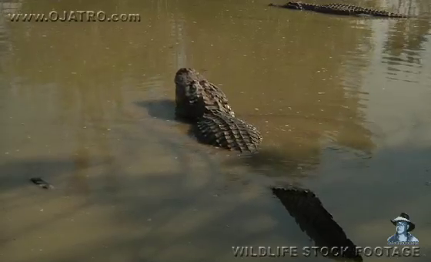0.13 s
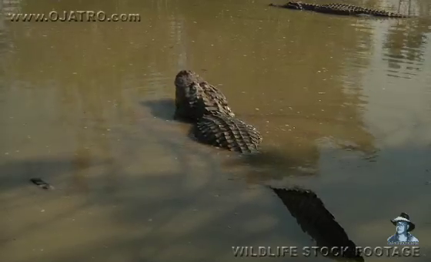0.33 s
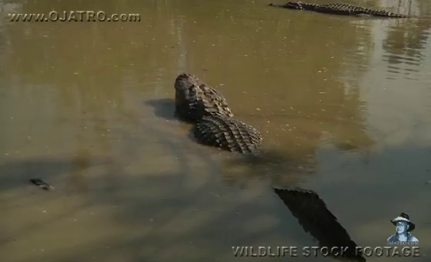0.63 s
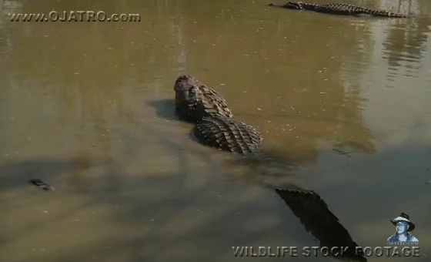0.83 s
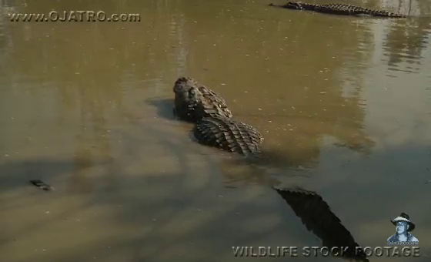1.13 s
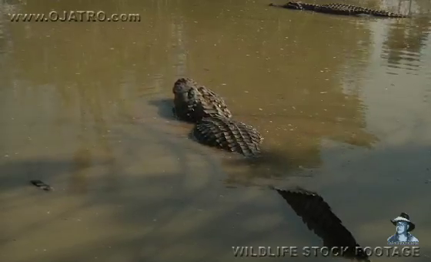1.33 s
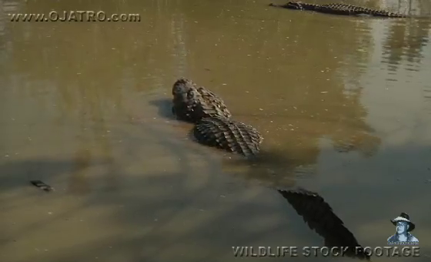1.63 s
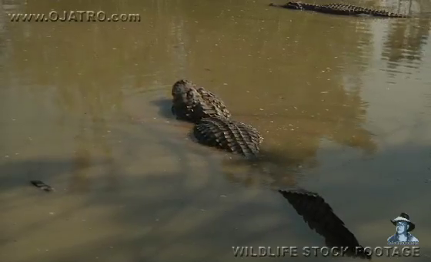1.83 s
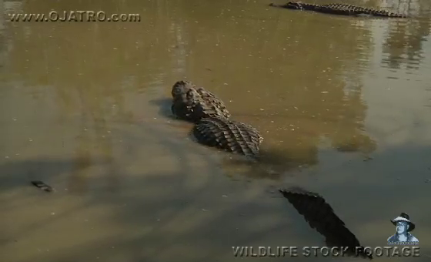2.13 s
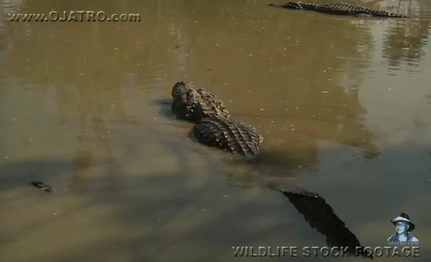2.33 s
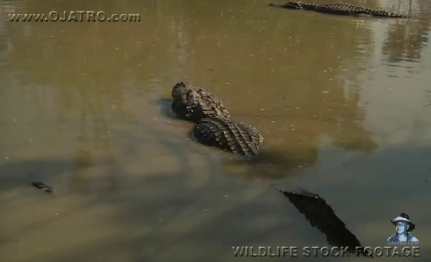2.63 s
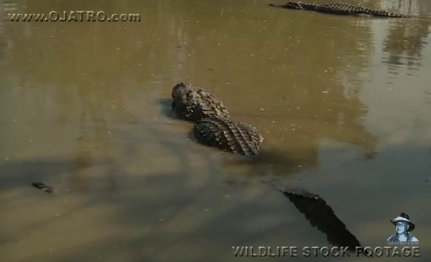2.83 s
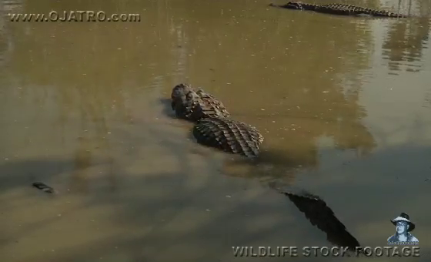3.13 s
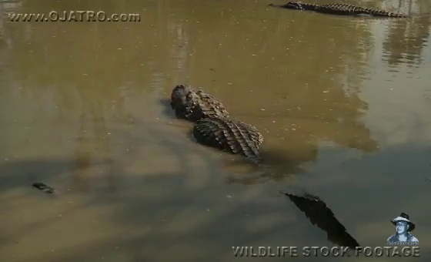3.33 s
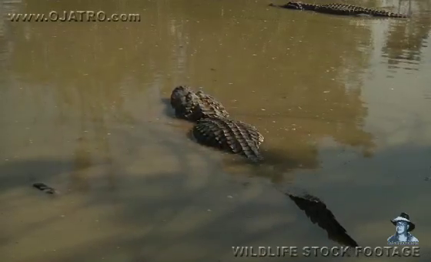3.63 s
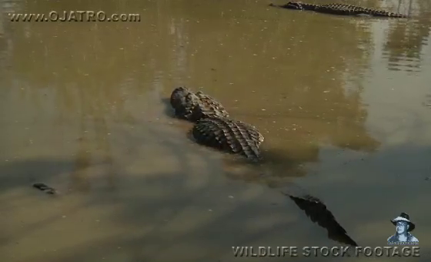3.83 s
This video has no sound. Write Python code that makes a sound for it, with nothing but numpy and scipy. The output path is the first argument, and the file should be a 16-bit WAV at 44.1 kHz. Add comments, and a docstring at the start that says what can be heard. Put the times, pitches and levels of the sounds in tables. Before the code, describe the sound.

An alligator bellows in a quiet outdoor pond: after two seconds of faint rumble and distant bird whistles, a deep sinking tone starts, breaks into knocking rattle, then swells to a rasping roar, heard fairly close.

```python
"""A swamp pond with a low steady rumble: birds whistle far off, then an alligator bellows.
Its slack folds start with a few knocks and settle into a deep sinking tone, air hissing from its nostrils.
The tone breaks into a rattle with moans, more knocks and a wheeze, then swells to a throbbing, rasping roar.
Water fizzes over its shaking back. Clicks and noise puffs timed by one fold rhythm ring body and throat
filters; moans, booms and whistles are sines."""
import sys
import numpy as np
from scipy import signal
from scipy.fft import rfft, irfft
from scipy.io import wavfile

SR = 44100
rng = np.random.default_rng(int(sys.argv[2]) if len(sys.argv) > 2 else 0)


def file_out(sig):
    """Save sig as 16-bit WAV at sys.argv[1]."""
    # one column per channel
    cols = np.atleast_2d(sig).T
    # limit, then scale
    lim = np.clip(cols, -1, 1)
    pcm = np.round(lim * 32767).astype(np.int16)
    wavfile.write(sys.argv[1], SR, pcm)


N = 176400
T = np.arange(N) / SR  # s

# outdoor rumble: (frequency [Hz], relative gain [dB])
RUMBLE_COLOUR = [(12, -52), (20, -14), (49, -1.5), (112, 0), (137, -0.5), (153, -11.5), (245, -8),
                 (266, -16.5), (324, -13.5), (404, -19), (597, -22), (1380, -42), (15500, -51)]
RUMBLE_DB = -46.5
# distant whistles: (time [s], length [s], start [Hz], end [Hz], peak level [dB])
BIRD_NOTES = [(0.885, 0.065, 3140, 2400, -78), (1.038, 0.06, 1850, 2230, -75),
              (1.356, 0.087, 3300, 1570, -75.5)]
# water thrown up by the back: (time [s], level [dB]); (frequency [Hz], relative gain [dB])
FIZZ_LEVEL = [(3.35, -72), (3.47, -58.5), (3.62, -54.5), (3.78, -54), (4.0, -53.5)]
FIZZ_COLOUR = [(700, -24), (1500, -12), (2600, 4.5), (3700, 0), (6300, 2), (7200, -5), (8100, 0.5),
               (8800, -9.5), (9700, -6.5), (11000, -19.5)]
# air out of the nostrils: (time [s], level [dB])
HISS_LEVEL = [(1.98, -94), (2.05, -63), (2.25, -59), (2.45, -61), (2.6, -64.5), (3.15, -63), (3.37, -69.5),
              (3.5, -70)]
# nostril resonances: (frequency [Hz], width [Hz] before scaling, relative gain [dB])
NOSTRIL_RESONANCES = [(2497, 100, 2.5), (2970, 260, 4), (4360, 1600, 0), (7030, 670, -0.5),
                      (9400, 2000, -14)]
NOSTRIL_WIDTH_SCALE = 1.78
# throat wheezes: (centre [s], half length to 1/e [s], frequency [Hz], width [Hz], peak level [dB])
WHEEZES = [(3.174, 0.086, 2700, 69.5, -63), (3.477, 0.048, 1850, 200, -53)]
# moans in the rattle: (time [s], length [s], start frequency [Hz], peak level [dB])
MOANS = [(2.709, 0.11, 599, -49), (2.94, 0.2, 420, -39.5), (3.123, 0.23, 427, -40)]
MOAN_SAG_HZ_PER_S, MOAN_WAVER_RATIO, MOAN_FLICKER_DB = 210, .012, 2
# air rasping through the throat: (time [s], level [dB] before trim and throb bursts)
RASP_LEVEL = [(1.98, -100), (2.05, -70), (2.7, -68.5), (2.95, -60.5), (3.37, -59), (3.46, -54),
              (3.505, -47.5), (3.78, -45.5), (3.84, -47.5), (4.0, -49)]
RASP_TRIM_DB = -1.5
# throat resonances: (frequency [Hz], width [Hz] before scaling, relative gain [dB])
THROAT_RESONANCES = [(993, 66, -3), (1076, 48, 4), (1376, 48, -4), (1620, 69, 0), (1836, 130, -5),
                     (2048, 31, 0.5), (2348, 69, -3.5), (2450, 72, -3.5), (2667, 42, -9), (3007, 26, -5),
                     (3600, 430, -18)]
THROAT_WIDTH_SCALE, THROAT_FLICKER_DB = 1.34, 2.5
SHUT_TILT_DB_PER_OCT, OPEN_S, OPEN_SPREAD_S = 0.5, 3.42, 0.068
AIR_LENGTH_TURNS, AIR_LEAK, TICK_AIR, TICK_SPREAD_DB = .25, .3, .55, 3.5
# throbs of the bellow: (time [s], boom peak [dB], rasp lift [0-1])
THROBS = [(3.583, -27.5, 0), (3.618, -27, 0.23), (3.73, -18, 0.04), (3.803, -27.5, .9), (3.866, -19, 0.98),
          (3.929, -19.5, 1)]
BOOM_HALF_S, BOOM_HZ = 0.0093, 146  # half lengths to 1/e
BURST_DB, BURST_LAG_S, BURST_HALF_S = 10.5, 0.0085, .011
# single slaps of the folds: (time [s], treble peak [dB] before trim, bass peak [dB])
KNOCKS = [(2.001, -73, -32), (2.022, -68, -27.5), (2.0425, -57, -27), (2.0663, -44, -33.5),
          (2.7866, -39, -48), (2.9234, -36, -33), (3.0222, -36, -37), (3.0635, -36, -27),
          (3.1679, -42, -35), (3.2075, -38, -25)]
TICK_TRIM_DB = -11
# slap ringing in the body, then in the throat: (frequency [Hz], relative gain [dB])
THUMP_COLOUR = [(30, -25.5), (180, 6.5), (300, -6.5), (600, -4.5), (780, -29), (4000, -64)]
TICK_COLOUR = [(500, -33), (1750, -17), (2300, 6.5), (2900, -12), (12000, -31)]
# irregular flapping: (time [s], level [dB] before the mid-rattle tilt); (frequency [Hz], relative gain [dB])
FLUTTER_LEVEL = [(1.98, -70), (2.04, -33.5), (2.5, -58.5), (2.86, -36.5), (2.95, -39), (3.2, -37.5),
                 (3.42, -35.5), (3.53, -33.5), (4.0, -33)]
FLUTTER_COLOUR = [(20, -38), (42, -25), (70, -6), (105, -4), (140, 10), (175, 6), (225, -1.5), (300, -11.5),
                  (400, 0), (460, -10), (510, -0.5), (550, -19), (590, -6.5), (660, -30.5), (780, -34),
                  (1200, -33.5), (1600, -53.5), (5000, -80)]
FLAP_WANDER_TURNS, FLAP_AIR = .07, .45
# the flapping is brightest in mid-rattle
RATTLE_S, RATTLE_HALF_S, RATTLE_TREBLE_DB, RATTLE_BASS_DB = 3.08, 0.18, 6, -3
# fold rate, four stages of the bellow: (time [s], pitch [Hz])
PITCH_START = [(2.0, 46.5), (2.05, 49.7), (2.09, 61)]
PITCH_TONE = [(2.15, 64.7), (2.516, 58.44), (2.748, 52.08), (2.876, 46.66)]
PITCH_RATTLE = [(3.0, 43.48), (3.2, 42.06), (3.36, 37.59), (3.43, 42.25)]
PITCH_ROAR = [(3.48, 59.73), (3.598, 61.61), (4.0, 63.56)]
# regular beating, smooth tone: (time [s], level [dB] before treble shading)
TONE_LEVEL = [(2.035, -55), (2.065, -32.5), (2.16, -27), (2.55, -29), (2.68, -33), (2.83, -35.5),
              (3.05, -42.5), (3.3, -38), (3.42, -30.5), (3.5, -64)]
# regular beating, hoarse roar: (time [s], level [dB])
ROAR_LEVEL = [(3.44, -70), (3.49, -28), (3.53, -30.5), (3.6, -29.5), (3.77, -30.5), (3.87, -29), (4.0, -29)]
# trunk shaking at the fold rate: (time [s], level [dB])
CHEST_LEVEL = [(2.5, -60), (2.7, -46), (3.5, -49), (3.6, -60)]
# body and throat colours of tone and roar: (frequency [Hz], relative gain [dB])
TONE_COLOUR = [(20, -41), (45, -6), (62, -3.5), (92, -6), (128, -0.5), (140, 7.5), (172, 3), (188, -19),
               (215, -2.5), (250, -2.5), (390, -9.5), (412, -10.5), (450, -1.5), (540, -14.5), (585, -2),
               (625, -7), (660, -21), (705, -20.5), (770, -39.5), (960, -37.5), (1270, -38), (1450, -65)]
ROAR_COLOUR = [(20, -38.5), (62, -10), (124, -1.5), (186, -5), (248, -5), (310, -14), (375, -7.5),
               (435, -21), (495, -12), (560, -27.5), (680, -38), (3000, -72)]
JITTER_TURNS, SHIMMER, ROAR_JITTER_TURNS, ROAR_SHIMMER = .003, .04, .025, .2
TREBLE_DB_PER_DB = 1.76  # extra gain of the upper partials as the tone swells
OPENING_HZ, OPENING_WIDTH_HZ = 120, 81  # the slow opening of the folds comes before their snap
BODY_HZ, BODY_WIDTH_HZ = 247, 130  # the body wall lags here and smears each pulse
SPLIT_HZ, STOP_HZ, EDGE_HZ = 326, 3000, 15800  # treble split, body wall limit, recorder limit


def amp(db):
    """Decibels to gain."""
    return 10 ** (np.asarray(db) / 20)


def unit(x):
    """Scales to rms 1."""
    return x / np.sqrt(np.mean(x ** 2) + 1e-20)


def curve(points):
    """Joins (time [s], value) points by straight lines."""
    return np.interp(T, *np.transpose(points))


def level(points):
    """Gain from a dB curve, silent before its first point."""
    return amp(curve(points)) * (T >= points[0][0])


def bump(centre_s, half_s):
    """Gaussian of height 1."""
    return np.exp(-((T - centre_s) / half_s) ** 2)


def arch(start_s, length_s):
    """Half-sine swell and fade."""
    return np.sin(np.pi * np.clip((T - start_s) / length_s, 0, 1))


def sweep(pitch_hz):
    """Sine whose phase sums the pitch."""
    return np.sin(2 * np.pi * np.cumsum(pitch_hz) / SR)


def drift(hz):
    """Slow random motion of rms 1."""
    f = np.fft.rfftfreq(N, 1 / SR)
    return unit(irfft(rfft(rng.standard_normal(N)) / (1 + (f / hz) ** 4), N))


def colour(x, points):
    """Minimum-phase filter with the given (frequency [Hz], gain [dB]) shape."""
    f, db = np.transpose(points)
    hz = abs(np.fft.fftfreq(16384, 1 / SR))
    log_gain = np.log(amp(np.interp(np.log(hz + 1), np.log(f), db)))
    spectrum = np.exp(np.conj(signal.hilbert(log_gain)))
    taps = np.fft.ifft(spectrum).real[:4096]
    return signal.fftconvolve(x, taps)[:N]


def strike(clicks, points):
    """Colours clicks so that each rings up to its own height."""
    single = colour(1. * (T == 0), points)
    return colour(clicks, points) / abs(single).max()


def ring(x, hz, width_hz):
    """A resonance with steep skirts: one complex pole, run twice."""
    pole = np.exp((2j * hz - width_hz) * np.pi / SR)
    for _ in range(2):
        x = signal.lfilter([1 - abs(pole)], [1, -pole], x + 1e-18)
    return 2 * x.real


def smear(x, hz, width_hz):
    """All-pass: delays what lies near one resonance, leaving all levels alone."""
    r = np.exp(-np.pi * width_hz / SR)
    a = [1, -2 * r * np.cos(2 * np.pi * hz / SR), r * r]
    return signal.lfilter(a[::-1], a, x)


def treble(x):
    """The part above the body's boom."""
    return signal.sosfiltfilt(signal.butter(2, SPLIT_HZ, "high", fs=SR, output="sos"), x)


def muffle(x):
    """The body wall passes little treble."""
    return signal.sosfilt(signal.butter(2, STOP_HZ, fs=SR, output="sos"), x)


def pulses(turns):
    """One click at each whole turn."""
    whole = np.floor(np.maximum.accumulate(turns))
    return np.diff(whole, prepend=np.floor(turns[0]))


def puffs(turns, length_turns, leak):
    """Noise let through once a cycle, over a steady leak."""
    gate = leak + np.exp(-(turns % 1) / length_turns)
    return unit(gate * rng.standard_normal(N))


def banks(x, t60_s, wet_db):
    """Faint scattered echoes from the banks and trees: decaying noise after a 20 ms gap."""
    t = np.arange(SR // 2) / SR
    tail = rng.standard_normal(len(t)) * amp(-60 * t / t60_s) * (t > .02)
    return x + amp(wet_db) * signal.fftconvolve(x, tail / np.linalg.norm(tail))[:N]


def background():
    """Steady low outdoor rumble and faint hiss: coloured noise."""
    return amp(RUMBLE_DB) * unit(colour(rng.standard_normal(N), RUMBLE_COLOUR))


def birds():
    """Faint gliding whistles far off in the trees, with strong echoes."""
    notes = np.zeros(N)
    for s, length_s, start_hz, end_hz, db in BIRD_NOTES:
        progress = np.clip((T - s) / length_s, 0, 1)
        pitch_hz = start_hz + (end_hz - start_hz) * progress
        notes += amp(db) * arch(s, length_s) * sweep(pitch_hz)
    return banks(notes, t60_s=.6, wet_db=-4)


def water(turns, drops_per_s=3000, size_db=4):
    """Tiny droplets dance off the back and patter on the pond: random clicks shaken at the fold rate, and noise."""
    sizes = amp(size_db * np.minimum(rng.exponential(1, N), 4)) * rng.standard_normal(N)
    drops = unit(sizes * (rng.random(N) < drops_per_s / SR))
    drops *= 1 + 0.22 * np.cos(2 * np.pi * turns)
    fizz = unit(colour(drops + rng.standard_normal(N), FIZZ_COLOUR))
    return level(FIZZ_LEVEL) * amp(drift(36)) * fizz


def hiss(turns):
    """Air hisses softly through the narrow nostrils, each resonance flickering."""
    sound = np.zeros(N)
    for hz, width_hz, db in NOSTRIL_RESONANCES:
        air = puffs(turns, length_turns=0.51, leak=1.7)
        sound += amp(db + 2.2 * drift(21)) * ring(air, hz, width_hz * NOSTRIL_WIDTH_SCALE)
    return level(HISS_LEVEL) * unit(sound)


def wheezes(turns):
    """Air squeezed through the narrowed throat briefly rings one resonance."""
    out = np.zeros(N)
    for s, half_s, hz, width_hz, db in WHEEZES:
        air = puffs(turns, length_turns=.5, leak=1)
        out += amp(db) * bump(s, half_s) * unit(ring(air, hz, width_hz))
    return out


def moans():
    """Short wavering overtones sink through the rattle."""
    out = np.zeros(N)
    for s, length_s, hz, db in MOANS:
        pitch_hz = (hz - MOAN_SAG_HZ_PER_S * (T - s)) * (1 + MOAN_WAVER_RATIO * drift(25))
        out += amp(db + MOAN_FLICKER_DB * drift(30)) * arch(s, length_s) * sweep(pitch_hz)
    return out


def throat(x, tilt_db_per_oct=0):
    """The upper resonances of the throat, each flickering on its own."""
    out = np.zeros(N)
    for hz, width_hz, db in THROAT_RESONANCES:
        gain_db = db + tilt_db_per_oct * np.log2(hz / 2000) + THROAT_FLICKER_DB * drift(19)
        out += amp(gain_db) * ring(x, hz, width_hz * THROAT_WIDTH_SCALE)
    return out


def rasp(turns):
    """Uneven ticks, then pulsed air, ring the throat; each throb adds a boom and, by its lift, a burst of rasp."""
    air = puffs(turns + 0.02 * drift(19), AIR_LENGTH_TURNS, AIR_LEAK)
    ticks = unit(pulses(turns + 0.075 * drift(20.4)) * amp(TICK_SPREAD_DB * drift(23)))
    ticks = ticks + TICK_AIR * air
    opening = (1 + np.tanh((T - OPEN_S) / OPEN_SPREAD_S)) / 2
    shut_sound = unit(throat(ticks, SHUT_TILT_DB_PER_OCT))  # thinner before the throat opens
    sound = opening * unit(throat(air)) + (1 - opening) * shut_sound
    boom, surge = np.zeros((2, N))
    for s, db, lift in THROBS:
        boom += amp(db) * bump(s, BOOM_HALF_S) * np.cos(2 * np.pi * BOOM_HZ * (T - s))
        surge += lift * bump(s + BURST_LAG_S, BURST_HALF_S)
    return boom + level(RASP_LEVEL) * sound * amp(BURST_DB * surge + RASP_TRIM_DB)


def knocks():
    """Single slaps thump the body and tick in the throat."""
    thump, tick = np.zeros((2, N))
    for s, treble_db, bass_db in KNOCKS:
        tick[round(s * SR)] = amp(treble_db)
        thump[round(s * SR)] = amp(bass_db)
    return strike(-thump, THUMP_COLOUR) + amp(TICK_TRIM_DB) * strike(tick, TICK_COLOUR)


def flutter(turns):
    """Uneven flaps and puffs of air boom in the body."""
    flaps = unit(pulses(turns + FLAP_WANDER_TURNS * drift(19.1)) * amp(2 * drift(45)))
    flaps = flaps + FLAP_AIR * puffs(turns, length_turns=0.95, leak=.4)
    sound = unit(smear(colour(flaps, FLUTTER_COLOUR), BODY_HZ, BODY_WIDTH_HZ))
    upper = treble(sound)
    lower = sound - upper
    bright = bump(RATTLE_S, RATTLE_HALF_S)
    tilted = upper * amp(RATTLE_TREBLE_DB * bright) + lower * amp(RATTLE_BASS_DB * bright)
    return muffle(level(FLUTTER_LEVEL) * tilted)


def voice(turns):
    """Regular pulses: a smooth sinking tone, then a hoarser roar; the trunk shakes along."""
    tone = -pulses(turns + JITTER_TURNS * drift(27)) * (1 + SHIMMER * drift(44))
    tone = unit(colour(tone, TONE_COLOUR))
    tone = smear(tone[::-1], OPENING_HZ, OPENING_WIDTH_HZ)[::-1]  # reversed: advances, not delays
    effort_db = curve(TONE_LEVEL) - curve(TONE_LEVEL).max()
    treble_db = TREBLE_DB_PER_DB * effort_db - 1.0 + 0.81 * drift(9.5)
    tone += treble(tone) * (amp(treble_db) - 1)
    roar = -pulses(turns + ROAR_JITTER_TURNS * drift(28.0)) * (1 + ROAR_SHIMMER * drift(50))
    roar = unit(smear(colour(roar, ROAR_COLOUR), BODY_HZ, BODY_WIDTH_HZ))
    chest = level(CHEST_LEVEL) * unit(np.cos(2 * np.pi * turns))
    return muffle(level(TONE_LEVEL) * tone + level(ROAR_LEVEL) * roar) + chest


def scene():
    """One fold rhythm drives the bellow and shakes the water."""
    pitch_hz = curve(sorted(PITCH_START + PITCH_TONE + PITCH_RATTLE + PITCH_ROAR))
    turns = np.cumsum(pitch_hz) / SR
    turns -= np.interp(KNOCKS[0][0], T, turns)  # a whole turn falls on the first knock
    animal = water(turns) + hiss(turns) + wheezes(turns) + moans()
    animal += rasp(turns) + knocks() + flutter(turns) + voice(turns)
    near = banks(animal, t60_s=.45, wet_db=-17)
    return (background() + birds() + near)[None]


def record(dry):
    """The recorder's band limit."""
    taps = signal.firwin(511, EDGE_HZ, window=("kaiser", 9), fs=SR)
    return signal.oaconvolve(dry, taps[None], "same")


dry = scene()
out = record(dry)
file_out(out)
```